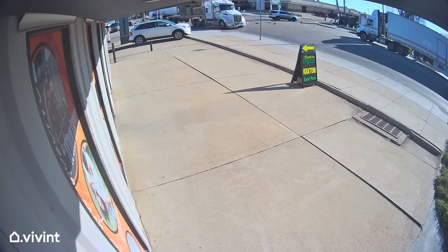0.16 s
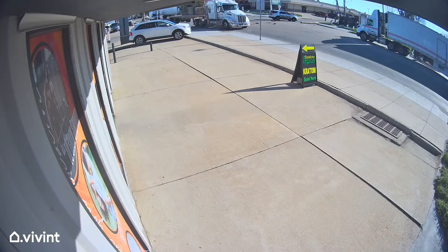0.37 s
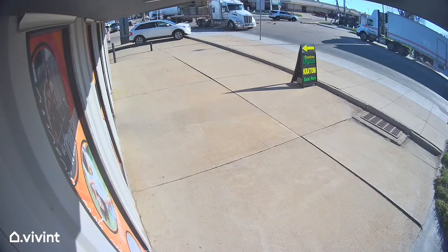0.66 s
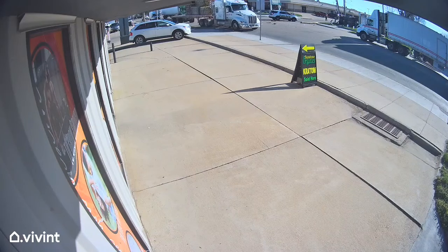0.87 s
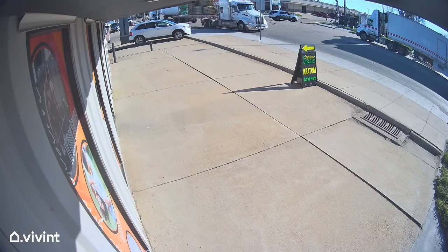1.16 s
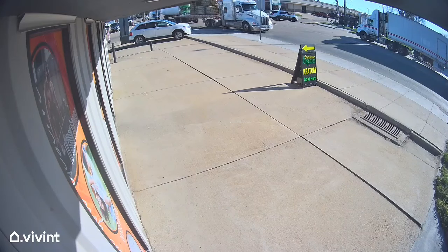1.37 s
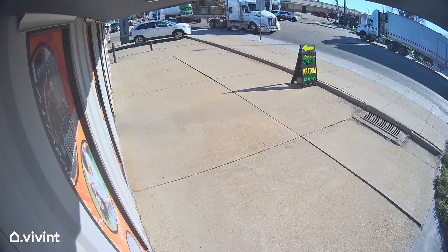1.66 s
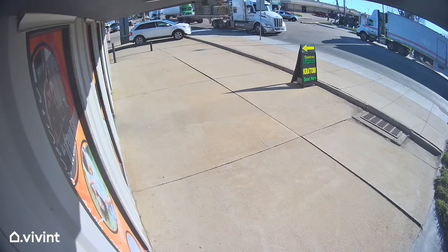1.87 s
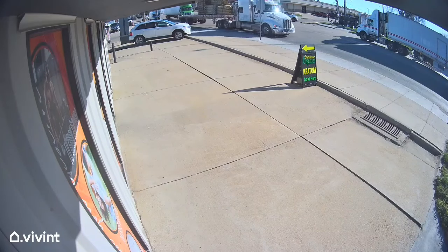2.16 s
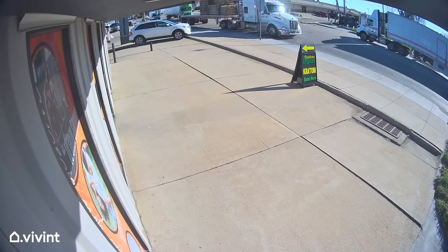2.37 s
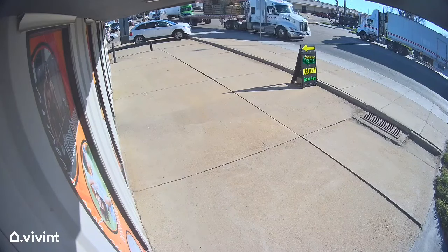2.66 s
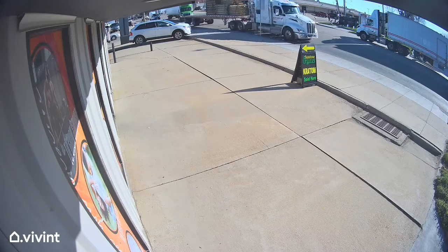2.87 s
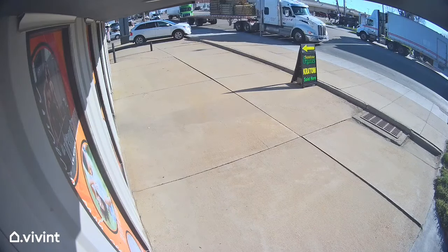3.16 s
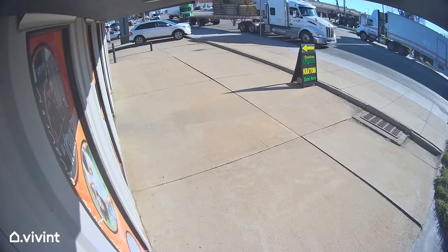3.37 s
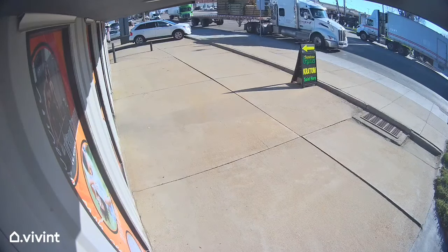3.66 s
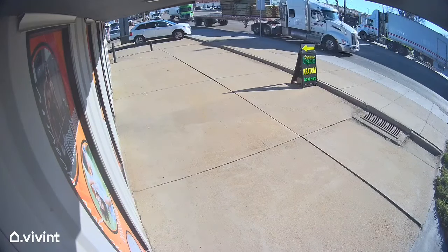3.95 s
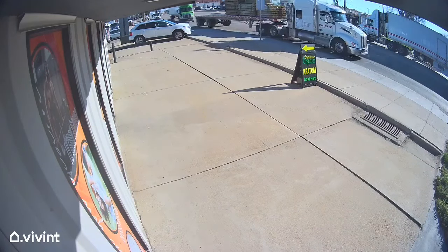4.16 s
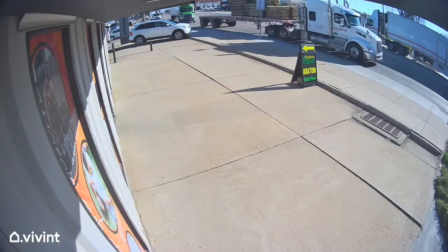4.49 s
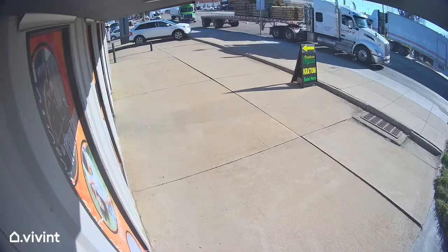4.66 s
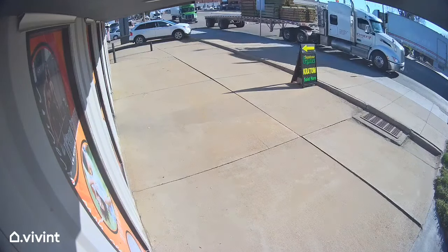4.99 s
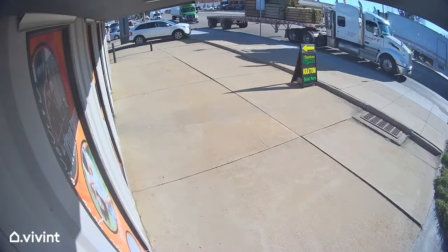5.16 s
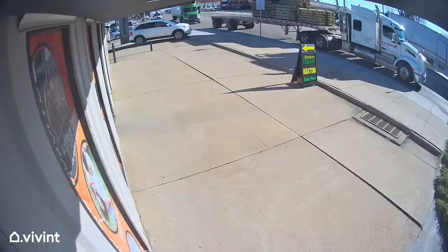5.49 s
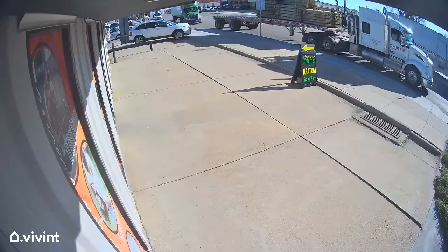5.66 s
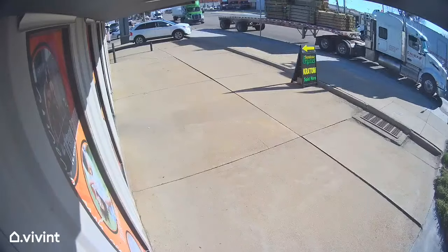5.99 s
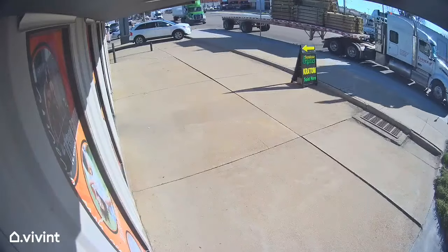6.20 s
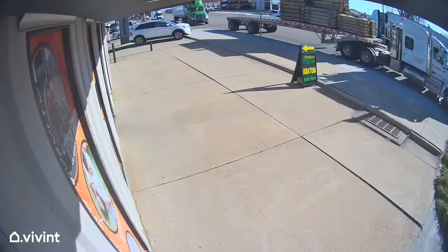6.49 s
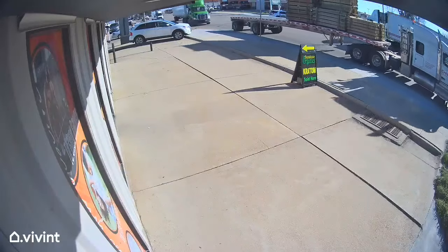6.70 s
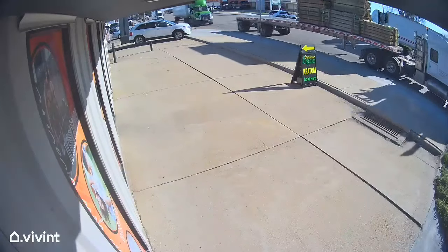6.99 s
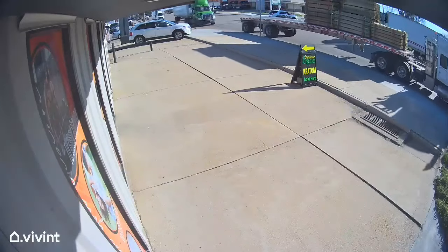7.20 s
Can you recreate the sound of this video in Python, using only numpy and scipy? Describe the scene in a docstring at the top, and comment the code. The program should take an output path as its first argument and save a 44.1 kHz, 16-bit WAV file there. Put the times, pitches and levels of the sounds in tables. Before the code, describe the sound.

Heavy trucks turn through a busy junction, with booming engine swells, roaring tyres and loose steel clanking.

```python
"""A busy junction, heard by a small wall camera across a forecourt, as heavy trucks turn through it.
A low engine drone near 133 Hz booms in swells over a rumble; the roar of engines and tyres throbs with it.
Loose steel clanks, load and chains clatter, a turbo and gears whine thinly, a dragging brake squeals.
The hiss of the nearest truck grows as it comes close, combed by an echo off the paving."""
import sys
import numpy as np
from scipy import signal
from scipy.fft import rfft, irfft, next_fast_len
from scipy.io import wavfile
from scipy.ndimage import map_coordinates

SR = 44100
rng = np.random.default_rng(int(sys.argv[2]) if len(sys.argv) > 2 else 0)


def store_pcm(level_fs):
    """Save levels as 16-bit WAV."""
    pcm = np.round(np.clip(level_fs, -1, 1) * 32767).astype(np.int16)
    wavfile.write(sys.argv[1], SR, np.atleast_2d(pcm).T)


N = 323694
STEP = 40   # samples between points of a coarse control curve

# slow levels under the surges: t/s, tyre roar/dB, engine knock/dB, exhaust rumble/dB
BED_LEVELS = [(0, -45.5, -45, -47.5), (.3, -46.5, -51.5, -49), (.46, -43.5, -50, -48),
              (.56, -39.5, -44.5, -44), (.92, -43.5, -42.5, -45), (1.2, -44, -46, -46),
              (1.3, -38.5, -43.5, -38.5), (1.55, -36.5, -39, -41), (1.8, -40.5, -44, -44.5),
              (2.15, -40, -48, -50), (2.55, -40, -40.5, -47), (3.05, -41, -45, -45.5),
              (3.3, -41.5, -43, -47.5), (3.62, -43.5, -47, -52), (4.1, -41, -43.5, -46.5),
              (4.6, -42.5, -44, -51), (5.2, -42.5, -42, -50), (5.8, -42, -39.5, -47.5),
              (6.36, -43, -43, -49), (7.34, -42, -42.5, -45.5)]
# the nearest truck's approach: t/s, nearness/0-1
NEARNESS = [(0, 0.16), (1.2, 0), (3.2, 0.12), (4.6, 0.6), (5.6, 0.49), (7.34, 1)]


def from_db(db):
    """Decibels to gain."""
    return 10 ** (np.asarray(db) / 20)


def rms_one(x):
    """Scale to rms 1."""
    return x / np.sqrt(np.mean(x ** 2) + 1e-20)


def curves(rows):
    """The columns after a table's time column, one value a sample."""
    times, *columns = np.transpose(rows)
    return [np.interp(np.arange(N) / SR, times, column) for column in columns]


def upsample(coarse):
    """A coarse curve at every sample."""
    return np.interp(np.arange(N) / STEP, np.arange(len(coarse)), coarse)


def drift(rate_hz):
    """A coarse random wander of rms 1: noise twice through a one-pole low-pass."""
    pole = np.exp(-2 * np.pi * rate_hz * STEP / SR)
    noise = rng.standard_normal(N // STEP + 2002)
    return rms_one(signal.lfilter([1], [1, -2 * pole, pole ** 2], noise)[2000:])


def from_peak(peak_s, rise, fall):
    """Coarse distance from a peak, in rises before it and falls after it, each at least 5 ms."""
    t = np.arange(N // STEP + 2) * STEP / SR - peak_s
    return np.maximum(-t / max(rise, .005), t / max(fall, .005))


def swells(rows):
    """Level in dB of swells that move 20 dB per rise or fall time; the loudest one counts."""
    levels = [peak_db - 20 * from_peak(s, rise, fall) for s, peak_db, rise, fall in rows]
    return upsample(np.maximum(np.max(levels, axis=0), -120))


def rough_noise(spectrum, flicker_db, flicker_hz):
    """Noise of rms 1 with a given spectral shape; each sixth of an octave flickers on its own."""
    size = next_fast_len(N)
    hz = np.arange(1, size // 2 + 2) * SR / size
    knots_hz, level_db = np.transpose(spectrum)
    shape = from_db(np.interp(np.log(hz), np.log(knots_hz), level_db, -90, -90))
    bins = rfft(rng.standard_normal(size)) * shape
    sixths = 6 * np.log2(hz / knots_hz[0])
    audible = 6 * np.log2(knots_hz[level_db > level_db.max() - 45] / knots_hz[0])
    out = 0
    for k in range(int(audible[0]), int(audible[-1]) + 2):
        low, high = np.searchsorted(sixths, [k - 1, k + 1])
        band = np.zeros_like(bins)
        band[low:high] = bins[low:high] * np.cos(np.pi / 2 * (sixths[low:high] - k)) ** 2
        out += irfft(band, size)[:N] * upsample(from_db(flicker_db * drift(flicker_hz)))
    return rms_one(out)


def tone(hz, level_db, rough, rough_hz):
    """A sine of given rms level, with the share `rough` of its power scattered into a thin band."""
    scatter = upsample(drift(rough_hz) + 1j * drift(rough_hz)) / np.sqrt(2)
    carrier = np.exp(2j * np.pi * np.cumsum(hz + np.zeros(N)) / SR)
    wobble = np.sqrt(1 - rough) + np.sqrt(rough) * scatter
    return np.sqrt(2) * (carrier * wobble).real * from_db(level_db)


def drone_boom():
    """A low engine drone, one slightly rough tone, booms in swells over a rumble."""
    # swells of the drone: t/s, tone/dB, rumble/dB
    levels = [(0, -41, -46), (.07, -54, -66), (.16, -42, -46), (.19, -63, -60), (.48, -57, -59),
              (.55, -35, -41), (.62, -39, -46), (.68, -42, -53), (.715, -35, -38), (.736, -50, -43),
              (.746, -18, -42), (.77, -34, -37), (.8, -40, -48), (.84, -38, -44), (.9, -54, -44),
              (.97, -49, -59), (1.06, -42, -52), (1.18, -69, -50), (1.27, -45, -52), (1.34, -35.5, -37),
              (1.41, -25.5, -46), (1.44, -11.5, -28), (1.46, -13, -27), (1.485, -16.5, -27),
              (1.53, -28.5, -36), (1.57, -20.5, -36), (1.625, -12.5, -24), (1.66, -18.5, -30),
              (1.695, -32, -39), (1.71, -37, -36), (1.75, -50, -50), (1.88, -51, -54), (1.93, -37, -46),
              (1.965, -33, -44), (1.995, -39, -39), (2.02, -25.5, -41.5), (2.037, -27.5, -25),
              (2.047, -38, -31), (2.08, -34.5, -48), (2.125, -47, -55), (2.2, -34, -56), (2.235, -44, -48),
              (2.32, -65, -61), (2.48, -39, -43), (2.55, -50, -57), (2.59, -52, -60), (2.62, -33, -54),
              (2.675, -40, -35.5), (2.7, -20, -37), (2.714, -27, -37), (2.73, -18, -35), (2.745, -25, -30),
              (2.77, -32, -47), (2.785, -41, -53), (2.85, -49, -53), (3.0, -48.5, -56), (3.3, -48.5, -52),
              (3.5, -63, -51)]
    # its pitch: t/s, f/Hz
    pitch = [(0, 118.3), (.2, 119.8), (.55, 130), (1.0, 132.6), (1.3, 135), (1.44, 133.4), (1.63, 134.9),
             (2.0, 135.4), (2.7, 136.7), (3.3, 138.4)]
    # colour of the rumble: f/Hz, level/dB
    colour = [(20, -6.5), (40, -2), (52, -11), (64, 3.5), (78, -1), (95, 5.5), (112, -3), (135, -5),
              (165, -6.5), (200, -2), (240, -11), (400, -28.5)]
    tone_db, rumble_db = curves(levels)
    rumble = from_db(np.maximum(rumble_db, -59)) * rough_noise(colour, flicker_db=2.5, flicker_hz=11)
    return tone(curves(pitch)[0], tone_db, rough=.06, rough_hz=30) + rumble


def surges():
    """Lifts in dB for the engines and for tyres and hiss: ramps up and down, plus a shared throb."""
    # surges of the roar: t/s, engine lift/dB, tyre and hiss lift/dB, rise/s, fall/s
    peaks = [(.12, 3.5, 2, 0.07, 0.12), (.765, 5.5, 4, 0.088, 0.14), (.98, -4, 0.5, 0.045, 0.053),
             (1.06, -1, 4, 0.021, 0.053), (1.46, 3, 6, 0.097, 0.18), (1.53, 0.5, 0.5, 0.047, .03),
             (1.64, 7, 8, 0.093, 0.11), (1.97, 6.5, 2.5, 0.069, 0.037), (2.035, 10, 8, 0.03, 0.1),
             (2.23, 6, 3.5, 0.14, 0.033), (2.47, 2.5, 1, 0.062, 0.04), (2.7, 4.5, -1.5, .05, 0.034),
             (2.755, 5, 9, 0.16, 0.051), (3.42, 4, 3, 0.063, 0.24), (3.67, 1.5, 3.5, 0.029, 0.049),
             (3.78, 3, 2, 0.034, 0.029), (3.95, 3.5, 2, 0.33, 0.1), (4.67, 6.5, 4, 0.025, 0.052),
             (4.75, 5, 2, 0.026, 0.094), (5.055, 1.5, 0.5, 0.026, 0.053), (5.445, 5, 4, 0.068, 0.024),
             (5.66, -1.5, 4, 0.067, 0.074), (6.1, 3.5, 2.5, 0.36, 0.19), (6.24, 3, 3, 0.17, 0.065),
             (6.47, 7, 3.5, 0.077, 0.029), (6.56, 5.5, 3, 0.074, 0.05), (6.769, 4.5, 3, 0.2, 0.032),
             (7.001, 2.5, 3.5, 0.061, 0.073)]
    lifts = sum(np.outer([engine_db, tyre_db], np.maximum(1 - from_peak(s, rise, fall), 0))
                for s, engine_db, tyre_db, rise, fall in peaks)
    throb_db = .63 * drift(3.5)
    return [upsample(lift + throb_db) for lift in lifts]


def tyre_roar(lift_db):
    """Tyres roar on the road, crossfading from the far trucks to the near one."""
    # colour of the far tyres: f/Hz, level/dB
    far_colour = [(470, -31), (800, -14), (913, -1.5), (1010, -8.5), (1070, -2.5), (1110, -1.5),
                  (1170, -3.5), (1300, -5), (1420, -7), (1620, -9), (1800, -5.5), (1940, -3.5), (2230, -5),
                  (2400, -6.5), (2750, -10.5), (2980, -12.5), (3600, -14.5), (4680, -35), (7920, -120)]
    # colour of the near tyres: f/Hz, level/dB
    near_colour = [(470, -26.5), (800, -3), (885, -10), (1300, -7), (1660, -8), (2330, -15.5), (2680, -16),
                   (2890, -16), (3600, -26.5), (4680, -57), (7920, -120)]
    nearness = curves(NEARNESS)[0]
    far = np.sqrt(1 - nearness) * rough_noise(far_colour, flicker_db=.5, flicker_hz=12)
    near = np.sqrt(nearness) * rough_noise(near_colour, flicker_db=1.5, flicker_hz=19)
    return from_db(curves(BED_LEVELS)[0] + lift_db) * (far + near)


def hiss(lift_db):
    """Air and tyres hiss in two flickering treble bands."""
    # slow levels of the hiss: t/s, air/dB, tyres/dB
    levels = [(0, -55, -62), (.4, -59.5, -63), (.6, -52.5, -57), (1.2, -54, -59.5), (1.5, -51, -55),
              (2.2, -55, -55), (3.56, -56, -58.5), (3.96, -54, -52.5), (4.2, -54.5, -54.5),
              (4.52, -53, -52.5), (4.66, -49, -51.5), (4.9, -49.5, -52.5), (5.17, -56, -53),
              (6.2, -58.5, -52), (7.34, -54, -52.5)]
    # colour of the air: f/Hz, level/dB
    air_colour = [(1760, -16), (3000, -5), (3560, -10), (3840, -8), (4240, -7), (5200, -16), (6760, -45),
                  (11400, -120)]
    # colour of the tyre hiss: f/Hz, level/dB
    tyre_colour = [(4300, -12), (5000, -4.5), (5500, -2.5), (6000, 1), (6500, -2), (7000, -2), (7250, -14),
                   (7450, -13), (8300, -30)]
    air_db, tyre_db = curves(levels)
    air = from_db(air_db + lift_db) * rough_noise(air_colour, flicker_db=.5, flicker_hz=32)
    return air + from_db(tyre_db + lift_db) * rough_noise(tyre_colour, flicker_db=.96, flicker_hz=21)


def paving_echo(x):
    """An echo off the paving, later as the truck nears, combs the sound with sliding notches."""
    # lag of the bounce: t/s, lag/ms
    lag_ms = [(0, 1.25), (3.6, 1.25), (4.3, 1.3), (5.0, 1.42), (5.4, 1.46), (6.0, 1.5), (7.34, 1.5)]
    positions = np.arange(N) - curves(lag_ms)[0] * SR / 1000
    return x + from_db(-11) * map_coordinates(x, [positions], order=3, mode="nearest")


def engine_knock(lift_db):
    """Engine blocks knock: a rough band of midrange noise."""
    # colour of the blocks: f/Hz, level/dB
    colour = [(240, -35.5), (400, -10.5), (466, -2), (502, 0), (546, 2.5), (726, -1), (885, -6),
              (1300, -10), (1690, -32), (2860, -120)]
    level_db = curves(BED_LEVELS)[1] + lift_db
    return from_db(level_db) * rough_noise(colour, flicker_db=1.66, flicker_hz=7.2)


def metallic_grain(x, depth_db=2, life_s=.032, width_hz=63):
    """Narrow bands ring up and die away at random: a coarse, metallic grain."""
    cells = signal.stft(x, nperseg=1024, noverlap=768)[2]
    patches = rng.standard_normal(cells.shape)
    for axis, span in enumerate((width_hz * 1024 / SR, life_s * SR / 256)):
        blur = np.exp(-.5 * (np.arange(-12, 13) / (span / 2)) ** 2)
        patches = signal.oaconvolve(patches, np.expand_dims(blur, 1 - axis), "same")
    gain = rms_one(from_db(depth_db * rms_one(patches)))
    return signal.istft(cells * gain, nperseg=1024, noverlap=768)[1][:N]


def idle_drone(lift_db):
    """Idling engines drone in the bass, following the surges gently."""
    # slow level of the drone: t/s, level/dB
    level = [(0, -50.5), (.45, -54), (.65, -45.5), (.9, -46), (1.2, -49), (1.4, -32.5), (1.6, -42),
             (1.85, -50), (2.2, -48.5), (2.75, -42.5), (3.0, -45), (3.56, -47.5), (3.96, -43), (4.25, -46),
             (4.6, -51.5), (6.2, -55.5), (7.34, -53)]
    # its colour: f/Hz, level/dB
    colour = [(20, -22), (40, -24.5), (70, -26), (100, -7.5), (145, -4.5), (180, -7), (230, -14)]
    level_db = curves(level)[0] + .83 * lift_db
    return from_db(level_db) * rough_noise(colour, flicker_db=3.5, flicker_hz=3.1)


def exhaust_rumble(lift_db):
    """Exhausts rumble in the low mids, leaning hard into the surges."""
    # colour of the exhausts: f/Hz, level/dB
    colour = [(71, -42.5), (120, -23), (146, -3), (237, 0.5), (312, -3), (426, -7), (450, -23.5),
              (580, -33), (990, -120)]
    level_db = curves(BED_LEVELS)[2] + 1.33 * lift_db
    return from_db(level_db) * rough_noise(colour, flicker_db=1.5, flicker_hz=17)


def struck_steel(blows, scatter_cycles=.35):
    """Each blow rings four close partials that start nearly in step, then beat and die quickly."""
    out, t = np.zeros(N + SR), np.arange(SR // 4) / SR
    for s, level_db, hz, length, spread_hz in blows:
        detune, phase = rng.random((2, 4, 1))
        partials = hz + spread_hz * (np.linspace(-1, 1, 4)[:, None] + .52 * (detune - .5))
        rise = .53 * length   # distance softens the attack
        ring = np.sin(2 * np.pi * (partials * (t - rise) + scatter_cycles * phase)).sum(axis=0) / 3
        envelope = np.minimum(t / rise, 1) * np.exp(-(t / length / 1.07) ** 2)
        start = round(s * SR)
        out[start:start + len(t)] += from_db(level_db) * envelope * ring
    return out[:N]


def steel_clanks(spread=.045):
    """Loose steel parts strike and ring briefly."""
    # the clanks: t/s, level/dB, f/Hz, length/s
    blows = [(0.038, -36.5, 1150, 0.022), (0.136, -36, 1480, 0.033), (0.475, -30.5, 1215, 0.027),
             (0.755, -28.5, 1145, 0.023), (0.952, -33.5, 2322, 0.024), (1.443, -17.5, 903, 0.04),
             (1.447, -21, 745, 0.033), (1.492, -25.5, 1150, 0.0092), (1.527, -30.5, 1950, .025),
             (1.622, -24, 2150, 0.026), (1.943, -24.5, 1089, 0.024), (1.933, -37, 2130, 0.023),
             (1.956, -30.5, 2400, 0.029), (2.009, -31, 2270, 0.019), (2.024, -30, 2480, 0.016),
             (2.057, -38, 2180, 0.028), (2.68, -29.5, 1304, 0.035), (2.885, -30, 1275, 0.019),
             (2.966, -33.5, 485, .025), (3.096, -33, 654, 0.0247), (3.388, -28, 567, 0.047),
             (3.649, -28, 693, 0.02), (3.666, -29, 960, 0.014), (3.678, -31, 583, 0.014),
             (3.694, -31, 1850, 0.026), (3.903, -31.5, 1570, 0.036), (3.918, -33, 1970, 0.016),
             (4.645, -34, 690, 0.011), (4.652, -32.5, 576, 0.015), (4.693, -34, 560, 0.011),
             (4.745, -35.5, 532, 0.016), (4.662, -35, 1237, 0.018), (4.662, -35, 1780, 0.023),
             (4.77, -37, 1320, .02), (4.728, -29.5, 738, 0.018), (5.027, -34, 714, 0.031),
             (5.022, -35, 1294, 0.029), (5.038, -34, 1570, 0.028), (5.055, -38, 1040, 0.01),
             (5.072, -38, 487, 0.012), (5.411, -27, 560, 0.023), (5.639, -33, 630, 0.026),
             (5.653, -28.5, 1008, 0.031), (5.875, -29, 664, 0.031), (5.968, -33, 605, 0.017),
             (6.082, -30.5, 618, 0.019), (6.143, -29.5, 530, 0.012), (6.063, -31, 640, .016),
             (6.098, -28.5, 780, 0.012), (6.17, -34.5, 1120, 0.028), (6.186, -31, 718, 0.026),
             (6.222, -34, 1080, 0.034), (6.221, -30, 514, 0.027), (6.466, -31, 1325, 0.021),
             (6.549, -32.5, 723, 0.02), (6.773, -34, 1123, 0.023), (6.927, -32, 1327, 0.042),
             (6.972, -25, 1294, 0.038), (7.231, -31.5, 1265, 0.042)]
    return struck_steel([(s, level_db, hz, length, spread * hz) for s, level_db, hz, length in blows])


def load_clatter(count=110, base_db=-42):
    """Small random knocks of load and chains, louder as the trailer nears, softer when high."""
    when, pitch, softness, length = rng.random((count, 4)).T
    s, hz = when * (N / SR), 450 * 2 ** (2.2 * pitch ** 1.5)
    nearness = np.interp(s, *np.transpose(NEARNESS))
    level_db = base_db + 5 * nearness - 6 * softness - 3 * np.log2(hz / 450)
    return struck_steel(zip(s, level_db, hz, .008 + .012 * length, .07 * hz))


def turbo_whistle(hz=1888):
    """Turbo blades whistle one thin note with a rougher octave above it."""
    # the note: t/s, level/dB
    note = [(.6, -70), (1.3, -63.5), (1.55, -38), (1.76, -53), (2.3, -53.5), (2.7, -50), (3.3, -52.5),
            (3.5, -63), (3.98, -53.5), (4.09, -55), (4.21, -50), (4.36, -59), (4.48, -46), (4.6, -56),
            (4.77, -48), (4.83, -61), (5.5, -61), (6.33, -53.5), (6.72, -50.5), (7.0, -66), (7.2, -58)]
    # its octave: t/s, level/dB
    octave = [(0, -70), (.6, -61), (1.1, -63.5), (1.6, -60), (2.3, -66.5), (2.8, -56.5), (3.4, -67),
              (3.9, -56.5), (4.3, -62), (5.0, -65), (7.3, -65)]
    return (tone(hz, curves(note)[0], rough=.2, rough_hz=10)
            + tone(2 * hz, curves(octave)[0], rough=.8, rough_hz=20))


def gear_whine():
    """Meshing gear teeth sing four unsteady tones that swell in and out, the highest one faint."""
    # swells of each whine, named for its rough pitch in Hz: t/s, peak level/dB, rise/s, fall/s
    whine_472 = [(5.08, -41, 0.074, 0.024), (5.46, -37, 0.32, 0.024), (5.653, -35, 0.12, 0.018),
                 (5.742, -48, 0.092, .05)]
    whine_540 = [(2.48, -41, 0.5, -0.1), (2.729, -33, 0, 0.13), (2.8, -49.5, 1.5, 4.5),
                 (3.43, -39, 0.36, 0.5), (3.69, -46, 0.3, -0.2), (4.125, -39, 0.2, -0.06),
                 (4.0, -46.5, 1.2, .8), (4.665, -41, -0.4, 0.17)]
    whine_1100 = [(1.352, -38, 0.04, 0.072), (1.456, -35.5, .02, 0.49), (1.666, -34.5, 0.36, 0.072),
                  (1.852, -42.5, .1, 0.067), (1.954, -40.5, 0.028, 0.25), (2.042, -35, 0.028, 0.05),
                  (2.1, -49.5, .05, 3.5), (2.758, -36.5, 0.24, 0.035), (2.8, -53.5, .05, 1.2)]
    whine_1520 = [(4.08, -55, 0.17, 0.17), (4.28, -53, 0.32, 0.095), (4.53, -51, 0.054, 0.14),
                  (4.7, -52, .1, .1)]
    # glides of two whines, the lower one sinking as the truck turns: t/s, f/Hz
    glide_540 = [(2.2, 545), (2.8, 545.5), (3.4, 542.8), (4.1, 541.8), (4.7, 533.6)]
    glide_1100 = [(1.35, 1108), (1.45, 1080), (1.67, 1086), (1.8, 1116), (2.76, 1115)]
    return (tone(curves(glide_540)[0], swells(whine_540), rough=.6, rough_hz=40)
            + tone(curves(glide_1100)[0], swells(whine_1100), rough=.3, rough_hz=14)
            + tone(472, swells(whine_472), rough=.7, rough_hz=28)
            + tone(1520, swells(whine_1520), rough=.5, rough_hz=20))


def brake_squeal():
    """A dragging brake squeals one ragged tone that lifts, then sags."""
    # swells of the squeal: t/s, peak level/dB, rise/s, fall/s
    peaks = [(4.755, -42, .05, 0.2), (4.944, -47, 0.13, 0.055), (5.05, -45.5, 0.14, 0.076),
             (5.15, -48.5, 0.15, 0.16), (5.33, -48.5, 0.27, 0.34), (5.45, -44, 0.49, 0.099)]
    # its glide: t/s, f/Hz
    pitch = [(4.74, 2345), (4.8, 2360), (4.95, 2405), (5.06, 2410), (5.14, 2350), (5.33, 2295),
             (5.47, 2265)]
    return tone(curves(pitch)[0], swells(peaks), rough=.85, rough_hz=55)


def scene():
    """All sources at one microphone; engines, tyres and hiss surge together."""
    rattles = steel_clanks() + load_clatter()
    boom = drone_boom()
    engine_lift, tyre_lift = surges()
    roar = metallic_grain(tyre_roar(tyre_lift) + paving_echo(hiss(tyre_lift)) + engine_knock(engine_lift))
    low_end = idle_drone(engine_lift) + exhaust_rumble(engine_lift)
    whines = gear_whine() + turbo_whistle() + brake_squeal()
    return (boom + roar + low_end + rattles + whines)[None]


def record(dry):
    """The small microphone loses the deepest bass, the top is cut; a faint self-noise stays."""
    thin = signal.sosfilt(signal.butter(3, 36, "high", fs=SR, output="sos"), dry)
    dull = signal.sosfilt(signal.ellip(12, .5, 65, 8100, fs=SR, output="sos"), thin)
    return dull + from_db(-101) * rng.standard_normal(dry.shape)


dry = scene()
out = record(dry)
store_pcm(out)
```